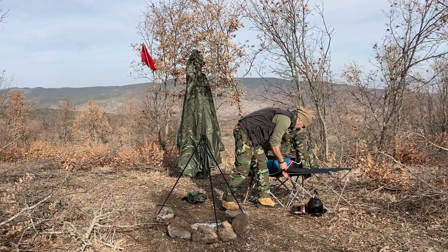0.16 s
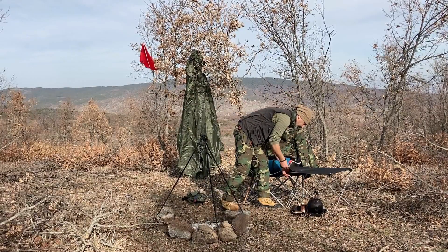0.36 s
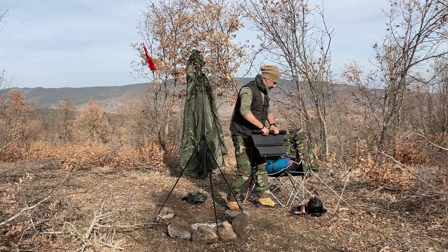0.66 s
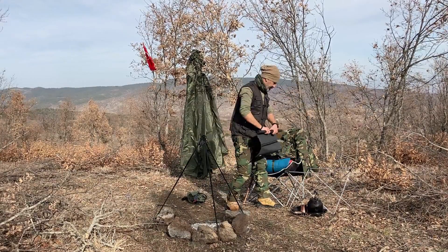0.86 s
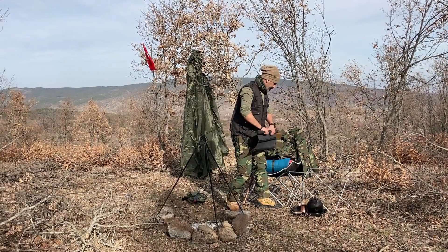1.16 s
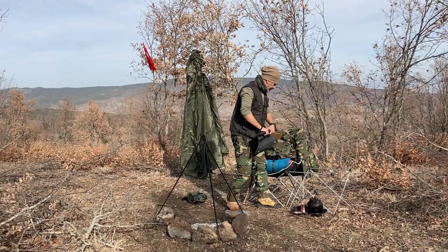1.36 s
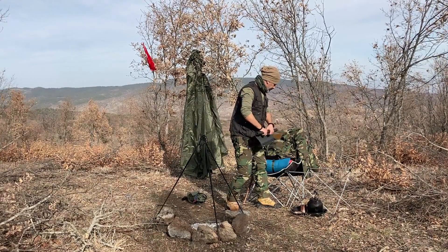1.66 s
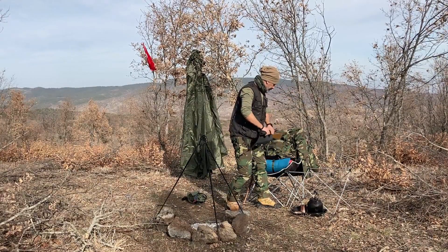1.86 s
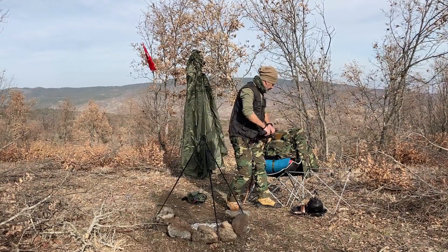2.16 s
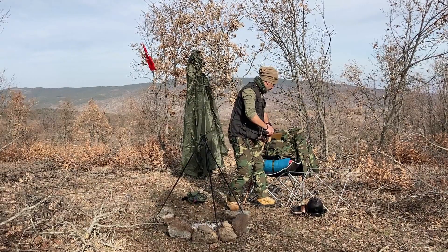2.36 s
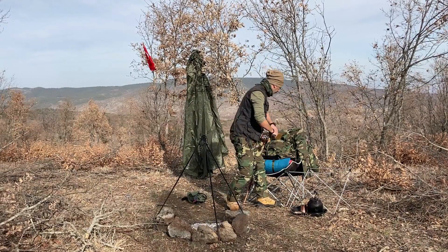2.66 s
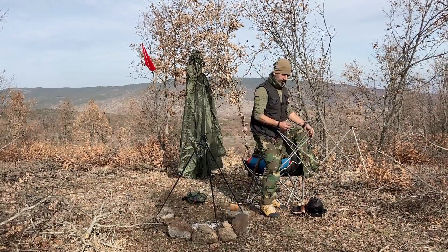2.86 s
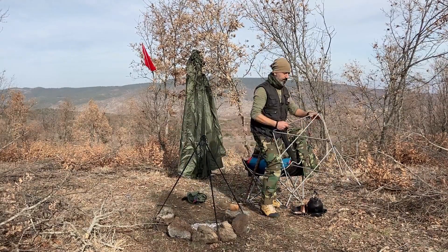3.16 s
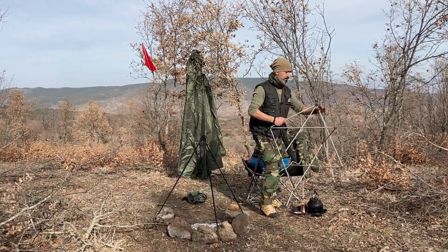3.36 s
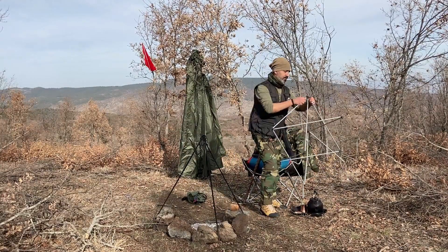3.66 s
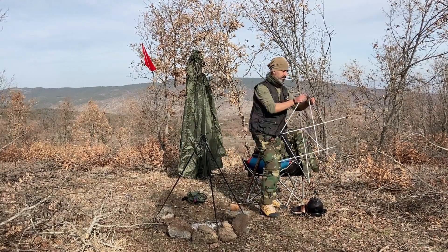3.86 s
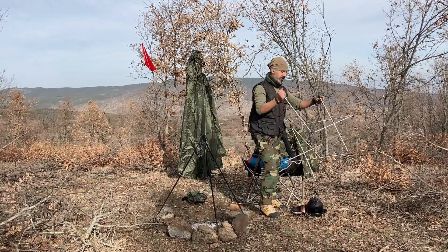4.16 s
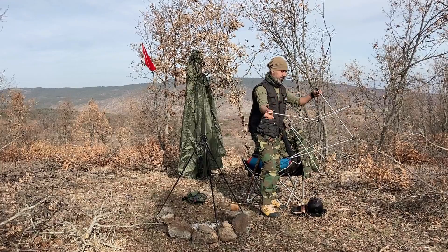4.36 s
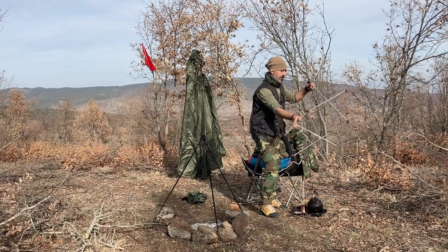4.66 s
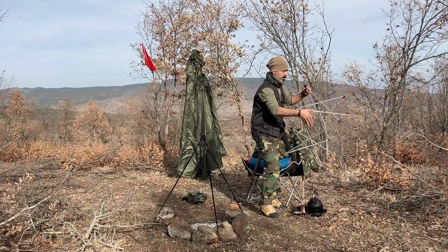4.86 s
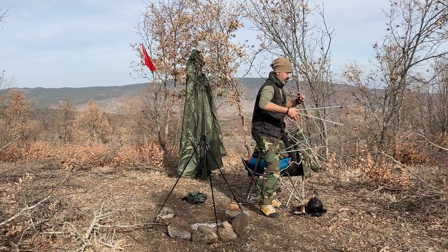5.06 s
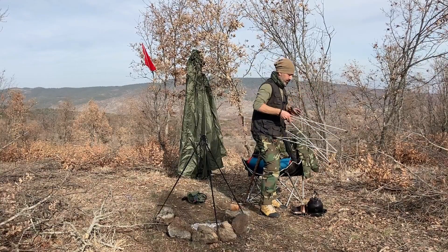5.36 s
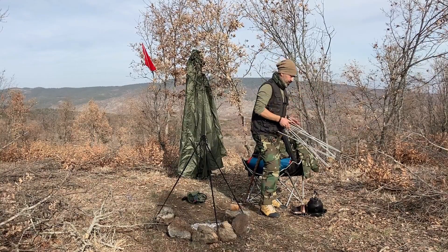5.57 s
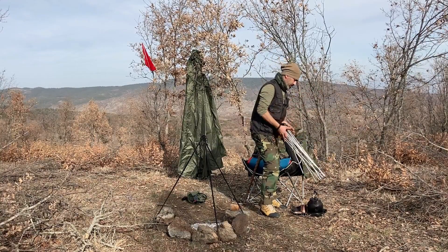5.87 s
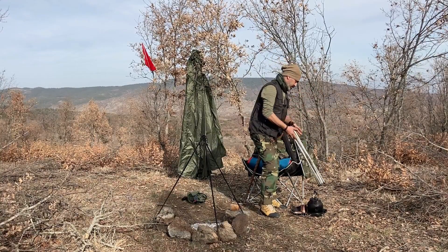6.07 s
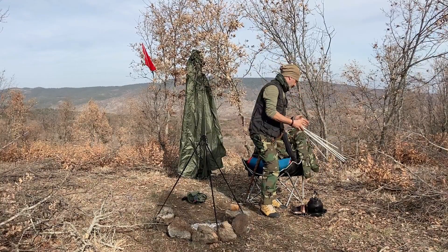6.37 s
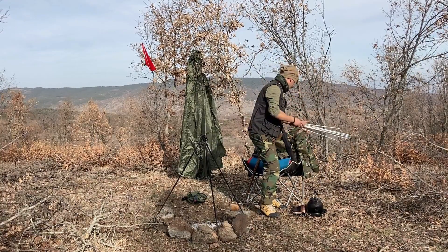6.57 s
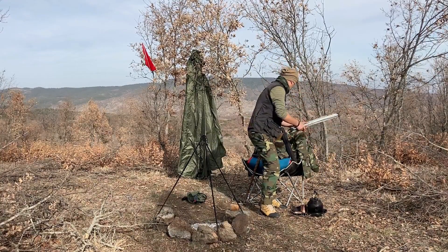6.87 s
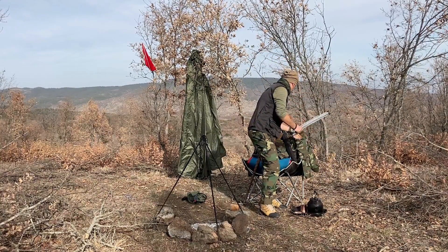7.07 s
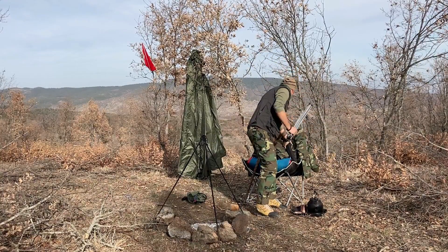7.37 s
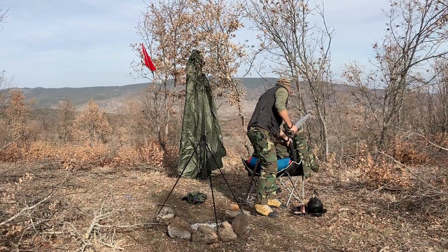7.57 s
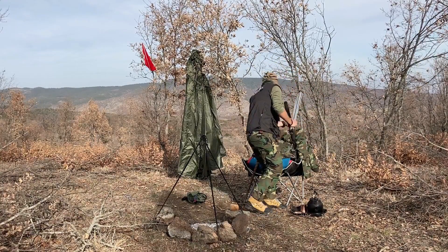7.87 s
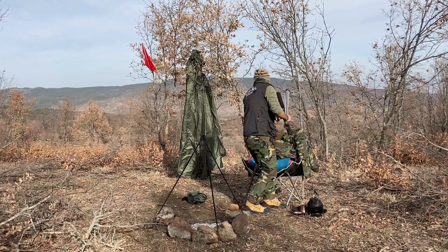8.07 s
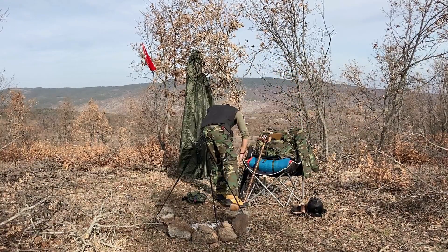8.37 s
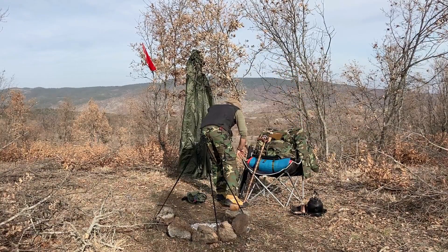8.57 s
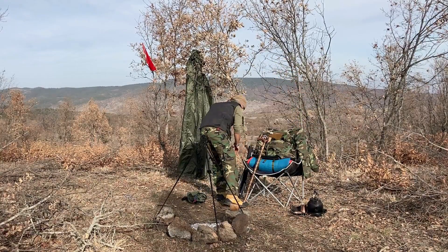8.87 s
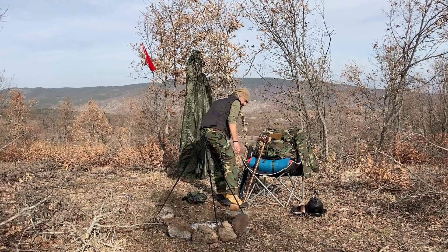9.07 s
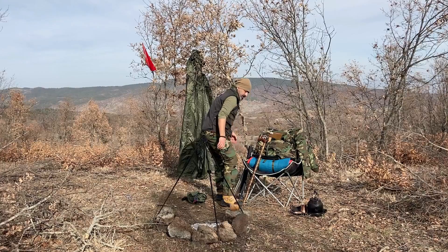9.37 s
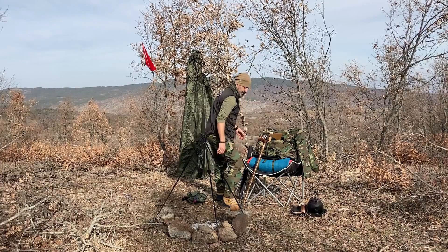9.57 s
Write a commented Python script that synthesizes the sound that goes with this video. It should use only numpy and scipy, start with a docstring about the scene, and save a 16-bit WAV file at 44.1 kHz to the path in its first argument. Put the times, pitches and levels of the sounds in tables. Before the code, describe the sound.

Close clothing rustles and soft thuds as a table top is rolled up, then thin metal poles clack together in quiet open air.

```python
"""A low rumble and rubbing cloth come first, then the dull knocks of a camping table top, outdoors.
The top comes off the frame and is rolled up against a nylon vest; then the folded frame's poles clack.
A microphone worn on the clothes hears it all over quiet air. Cloth, air and rumble are filtered noise;
knocks and clacks are noise bursts with decaying modes; swishes and faint distant chirps are tones of
unsteady pitch."""
import sys
import numpy as np
from scipy import signal
from scipy.fft import rfft, irfft
from scipy.io import wavfile
from scipy.ndimage import uniform_filter1d

SR = 44100
rng = np.random.default_rng(int(sys.argv[2]) if len(sys.argv) > 2 else 0)


def master(y):
    """Save y as 16-bit WAV."""
    cut = np.clip(np.atleast_2d(y).T, -1, 1)
    pcm = np.round(cut * 32767)  # scale
    wavfile.write(sys.argv[1], SR, pcm.astype(np.int16))


N = 428957
T = np.arange(N) / SR

# Spectra, each a curve of (frequency [Hz], relative level [dB])
# distant open air
AIR_SPECTRUM = [(60, -1), (120, -5), (380, -4), (800, -12.5), (1700, -18), (2500, -15), (3500, -21.5),
                (4500, -19), (6500, -23.5), (8400, -21.5), (10500, -30), (14000, -33.5), (16000, -49.5)]
# low pushing on the microphone
BUFFET_SPECTRUM = [(5, -7.5), (15, 5), (35, -5), (60, -9.5), (100, -17), (200, -38.5), (500, -57)]
# flapping folds
FLAP_SPECTRUM = [(60, -14), (130, -1), (270, 0), (500, -5.5), (800, -12.5), (1600, -42)]
# layers of cloth rubbing
RUB_SPECTRUM = [(250, -18.5), (600, -2), (1100, 2.5), (2300, -2), (3500, -8.5), (6000, -16), (12000, -55)]
# nylon hissing
NYLON_SPECTRUM = [(1500, -17.5), (3500, -2.5), (5000, -2), (7000, 0), (9200, 2.5), (10600, -5), (13500, -6),
                  (14700, -18), (15800, -32)]
# a fold snapping over
CREASE_SPECTRUM = [(80, -9), (250, 1.5), (1200, -8.5), (2500, -8.5), (6000, -14.5), (15000, -36.5)]
# dull blow, before its three bands are levelled
THUD_SPECTRUM = [(40, -19), (130, -0.5), (240, -3.5), (400, -1.5), (550, -2.5), (1100, -1), (2400, -7.5),
                 (4000, -24.5), (7000, -27), (15000, -45.5)]
# metal contact itself, struck or scraped
CONTACT_SPECTRUM = [(60, -26), (300, -20.5), (700, -4), (1500, -0.5), (4000, 0.5), (8000, -0.5),
                    (10500, -7.5), (15000, -41.5)]

# Body bending or shifting against the microphone: (time [s], length [s], level [dB])
BODY_SHIFTS = [(0.0, 0.14, -29.5), (0.157, 0.19, -23), (0.32, 0.19, -27), (0.5, 0.19, -39),
               (1.09, .65, -38), (2.33, 0.26, -31), (3.19, 0.27, -45), (5.43, 0.53, -34),
               (6.047, 0.36, -38.5), (6.594, 0.25, -41), (8.06, 0.23, -40.5), (8.93, 0.69, -45),
               (9.26, 0.53, -34.5)]
# Soft bumps against the microphone: (time [s], envelope peak [dB], frequency [Hz])
SOFT_BUMPS = [(2.53, -27, 45), (2.919, -38.5, 121), (5.823, -18.5, 60)]
# Faint distant chirps or whistles, perhaps of a bird:
# (time [s], length [s], peak of the fundamental [dB], start pitch [Hz], end pitch [Hz])
FAINT_CHIRPS = [(8.312, .045, -55, 3250, 3100), (8.48, 0.088, -67, 2350, 2200),
                (8.97, .09, -66, 2500, 2300)]
# Slow arm movements drawing sleeves over the vest, before the mixing gains of cloth():
# (time [s], length up to release [s], rubbing [dB], flapping [dB re rubbing], hiss [dB re rubbing])
ARM_REACHES = [(-0.1, .19, -50.5, -0.5, -5), (0.42, 0.19, -56, -0.5, -4.5), (1.9, 0.63, -49.5, -1, -5),
               (3.27, 0.14, -53.5, -0.5, -4), (3.5, 0.33, -68, 5.5, 12), (3.82, 0.58, -65, 0.5, -1.5),
               (4.45, 0.61, -67, -0.5, 0), (5.03, 0.31, -56, -0.5, 1.5), (5.41, 0.17, -52, 9, -3),
               (5.62, 0.24, -54, 6.5, -0.5), (5.98, .25, -49.5, 0.5, -3), (6.27, 0.34, -58.5, 2, -1.5),
               (6.66, 0.092, -55, -3.5, 6), (6.94, 0.14, -63, 4, 8.5), (7.15, 0.3, -64, 5.5, 7),
               (7.41, .19, -47.5, -0.5, -0.5), (7.68, 0.21, -64.5, -2, -2), (7.93, 0.31, -56.5, 0, -1),
               (8.3, 0.84, -75, 6.5, 5.5), (8.95, 0.41, -65, 7, -3), (9.3, 0.74, -61.5, 1, -9)]
# Quick tugs of cloth, as in rolling up the table top, before the mixing gains of cloth():
# (time [s], length up to release [s], rubbing [dB], flapping [dB re rubbing], hiss [dB re rubbing])
CLOTH_TUGS = [(0.26, 0.052, -48.5, 7, -19), (0.47, 0.064, -53.5, 5, 0), (0.724, 0.16, -41, -3.5, -4.5),
              (0.88, 0.14, -48, 1, 1.5), (1.01, 0.072, -42, -1.5, -1), (1.105, 0.055, -42, 2.5, -7),
              (1.167, 0.11, -40, -2, -0.5), (1.285, 0.053, -36.5, 1.5, -2.5),
              (1.37, 0.051, -40.5, -0.5, -4), (1.425, 0.027, -44.5, 1, 3.5), (1.458, .14, -38.5, 0, -2),
              (1.6, 0.17, -40.5, -0.5, 0.5), (1.78, 0.044, -36.5, 3.5, -4), (1.84, .05, -43.5, -0.5, 2.5),
              (1.895, 0.05, -48, 0, 4), (1.955, 0.088, -44, 1, 3), (2.108, 0.052, -40, -4, 1),
              (2.175, 0.097, -50.5, 2, -1), (2.258, 0.07, -44, 6.5, 4), (2.345, 0.11, -40, 0, 1),
              (2.56, 0.095, -42, -4, 5.5), (2.665, 0.081, -42.5, 4.5, 2), (2.752, 0.07, -38.5, 1, 1),
              (2.85, 0.07, -48.5, 2.5, 2), (2.95, .075, -71, -11, 11), (8.144, 0.062, -42, -7, 6.5)]
# Ribbed cloth sliding: (time [s], length [s], level [dB], start pitch [Hz], end pitch [Hz],
# unsteadiness [relative to pitch, before scaling])
RIB_SWISHES = [(0.215, 0.023, -31, 2270, 2530, 0.27), (0.222, 0.028, -23, 257, 247, 0.11),
               (0.257, .06, -54, 2400, 2220, 0.16), (0.463, 0.088, -54.5, 5940, 6900, 0.24),
               (1.833, 0.025, -31, 1056, 1030, 0.11), (2.119, 0.046, -40.5, 1906, 1380, 0.16),
               (2.237, 0.058, -34.5, 1187, 1685, 0.34), (2.406, 0.055, -39, 2310, 4200, 0.28),
               (3.544, 0.048, -62, 2200, 2640, 0.089), (3.551, 0.057, -59, 3700, 4500, 0.11),
               (3.655, 0.11, -71, 2400, 3000, 0.22), (3.569, 0.28, -54.5, 6000, 9100, 0.18),
               (3.619, 0.23, -52, 12400, 13000, .09), (3.885, 0.081, -55, 3300, 3420, 0.29),
               (3.96, 0.25, -65.5, 3270, 3040, 0.155), (4.075, 0.09, -56.5, 724, 656, 0.1),
               (4.262, 0.1, -63, 2280, 3240, 0.24), (5.318, 0.1, -52.5, 1710, 2370, 0.15),
               (7.389, 0.056, -43.5, 1776, 1675, 0.23), (7.509, 0.061, -45.5, 348, 295, .1),
               (9.228, 0.027, -43, 436, 430, 0.19)]
# Pole sliding on pole: (time [s], length [s], level [dB], singing frequency [Hz])
POLE_SCRAPES = [(5.063, 0.055, -41, 4970), (6.737, 0.024, -41, 6700), (6.779, 0.053, -38, 9100),
                (6.849, 0.023, -46, 6000), (7.16, 0.003, -32, 4500)]
# Modes of the table top: (frequency [Hz], bandwidth [Hz], relative level [dB])
TABLE_TOP_MODES = [(271, 38, 4.5), (562, 41, -5.5), (724, 42, 1), (1046, 77, 1.5), (1400, 49, -4.5),
                   (2480, 48, -17)]
# Dull knocks and cloth snaps: (time [s], level over 10 ms [dB], bass [dB re level],
# treble [dB re level], decay time t60 of the dull clatter [s])
DULL_KNOCKS = [(0.2352, -18, -6.5, -19, 0.061), (0.2416, -27.5, 6.5, -1.5, 0.017),
               (0.2516, -19.5, -2, -23, 0.024), (0.374, -29.5, -1.5, -43, 0.028),
               (0.4307, -15.5, -3.5, -14.5, 0.032), (0.451, -18, -1, -16, 0.047),
               (0.7606, -35.5, 0, -8, 0.027), (0.7679, -38, 7, -8, 0.053), (0.794, -35.5, 1, -19.0, 0.035),
               (0.8655, -36.5, -8, -16, 0.14), (1.0286, -32.5, -6, -9, 0.018),
               (1.2296, -25.5, -12, -6.5, 0.0068), (1.312, -38.5, 5, -5, 0.075),
               (1.4552, -30, 3, -28, 0.025), (1.5793, -26, -4.5, -32, 0.032), (1.6653, -36, 2, -15, 0.046),
               (1.92, -33, 0, -25, 0.025), (2.3869, -31.5, -2.0, -3.5, 0.033),
               (2.4066, -21, -7.5, -13, 0.0012), (2.528, -33.5, 6.5, -3.5, 0.034),
               (2.7839, -33, 0.5, -3.5, 0.091), (5.571, -50, 9.5, -10, 0.027), (6.251, -55, 13, -8, 0.035),
               (7.454, -51.5, 13, -12.0, 0.064), (8.0172, -45, -1.0, -21, 0.0082),
               (8.081, -50, 9, -13, 0.028), (8.1443, -36.5, 1, -6, 0.094), (8.501, -56.5, -3, -21, 0.025),
               (9.349, -51, 13.5, -19, 0.018)]
# Modes of the poles: (nominal frequency [Hz], bandwidth [Hz], relative level [dB])
TUBE_MODES = [(1250, 170, -6), (1940, 270, -10.5), (2270, 180, -1.5), (2730, 83, -7), (3210, 150, -1),
              (3615, 91, -4), (4140, 170, 4.5), (4640, 110, -3), (5244, 150, 3), (5890, 120, 2.5),
              (6600, 160, 5.5), (7180, 94, -3.5), (7580, 95, -4.5), (8260, 140, 4), (8960, 150, 1.5),
              (9250, 110, -3.5), (9880, 86, -5.5), (11360, 150, -10), (11700, 110, -10.5),
              (13000, 110, -8.5), (14000, 92, -14.5)]
# Pole on pole: (time [s], level over 10 ms [dB], body [dB re level], top [dB re level],
# main favoured region [Hz], lower favoured region [Hz])
POLE_CLACKS = [(2.9589, -47.5, -7, -5, 2410, 2290), (3.091, -57.5, -11, -25, 3750, 870),
               (3.137, -50.0, -5, -25, 4320, 1580), (3.6865, -45, -10, -12, 3510, 2100),
               (3.9589, -27.5, -8.5, -10.5, 5080, 3560), (4.8952, -21.0, -18.5, -20, 5610, 3600),
               (4.966, -45, 2.5, -27, 2400, 2290), (5.0411, -15.0, -18.5, -16, 6300, 3110),
               (5.054, -25, -20, -17, 5980, 3100), (5.1375, -42, -15, -18, 5230, 3600),
               (5.1462, -44, -18, -23, 3420, 2290), (5.1789, -30, -4, -5.5, 5370, 2020),
               (5.1971, -29.5, -17, -22, 3420, 2290), (5.217, -46, -16, -13, 5430, 3520),
               (5.4624, -39.5, -1, -19, 6020, 1390), (5.476, -35, -4, -19, 2430, 1980),
               (5.4806, -38.5, 3.5, -25, 2800, 1400), (5.5177, -41, -3, -10, 2500, 1390),
               (5.5338, -42.5, -5, -6, 4210, 1130), (5.7524, -28, -14, -8, 7610, 2020),
               (5.8713, -37.5, -14, -12, 8420, 3000), (5.9806, -40, -14, -12, 6870, 3600),
               (6.0521, -41, -3.5, -15, 8550, 1780), (6.1101, -41.5, -7, -13, 2400, 2290),
               (6.1394, -33.5, -2.5, -11, 6490, 1820), (6.16, -40.5, 1, -20, 9180, 1360),
               (6.334, -46.5, -16, -16, 8410, 1430), (6.374, -44.0, 2, -20, 2760, 1290),
               (6.43, -42.0, -5, -23, 4960, 1360), (6.4729, -44.5, -8, -15, 7020, 1870),
               (6.6859, -14, -10.5, -21.5, 8200, 1970), (6.7603, -34.5, -16, -16.5, 8990, 2380),
               (6.7901, -34, -4, -19, 6710, 2110), (6.8191, -30.5, -12, -21, 2970, 2230),
               (6.861, -17.5, -18, -13.5, 8250, 2200), (7.104, -37.5, -4, -23.5, 3820, 1420),
               (7.1631, -13.5, -8.5, -13.5, 4150, 1720), (7.18, -24, -15, -16.5, 8480, 2630),
               (7.1957, -36.5, -17, -18, 5100, 3600), (7.319, -46, -4, -19, 2400, 2230),
               (7.4876, -42, -4, -13, 4830, 2100), (7.499, -31.5, -16, -7, 4800, 3600),
               (7.533, -41, -5, -7, 4830, 1890), (7.6582, -23, -20, -11.5, 6330, 2550),
               (7.66, -17.5, -16, -4, 7620, 2720), (7.672, -36.5, -14, -10.5, 4720, 3600),
               (8.103, -46, -10, -14, 4300, 2660), (8.722, -48.5, 1, -8, 6940, 1230),
               (9.1498, -51.5, -6, -18, 8800, 1080)]

AIR_DB = -58.5
SWAY_DB, SWAY_DEPTH_DB, SWAY_HZ = -49.5, 3.5, 6  # the slight sway of someone standing
PUSH_DB = -0.5  # rumble relative to the flapping that causes it
SHIFT_TAPER = 0.5  # share of a shift spent swelling and fading
BUMP_RISE_S = 0.0058
CHIRP_OVERTONE_DB = -4  # relative to the fundamental
CREASES_PER_S, CREASE_DB, CREASE_SPREAD_DB = 45, -9, 7.5  # the level is relative to the rubbing
REACH_ATTACK_S, REACH_RELEASE_S = 0.073, 0.092
TUG_ATTACK_S, TUG_RELEASE_S = 0.007, 0.025
BAND_EDGE_HZ = 15700


def amp(db):
    """Definition of level: decibels to an amplitude ratio."""
    return 10 ** (np.asarray(db) / 20)


def evened(x):
    """Normalization of power: scales to rms 1."""
    return x / np.sqrt(np.mean(x ** 2) + 1e-20)


def add(mix, start_s, sound):
    """Superposition: adds a sound into the mix, in place, from a start time."""
    part = mix[max(round(start_s * SR), 0):][:len(sound)]
    part += sound[:len(part)]


def colour(x, spectrum, size=8192):
    """Minimum-phase filtering: a causal response made from the Hilbert transform of the log gain."""
    hz, db = np.transpose(spectrum)
    bin_hz = abs(np.fft.fftfreq(size, 1 / SR)) + 1
    log_gain = np.log(amp(np.interp(np.log(bin_hz), np.log(hz), db)))
    response = np.exp(np.conj(signal.hilbert(log_gain)))
    taps = np.fft.ifft(response).real[:size // 2]
    return signal.oaconvolve(x, taps)[:len(x)]


def wander(rate_hz):
    """Band-limited chance: Gaussian low-passed noise of rms 1, about as fast as the rate."""
    spectrum = rfft(rng.standard_normal(N))
    lowpass = np.exp(-(np.fft.rfftfreq(N, 1 / SR) / rate_hz) ** 2)
    return evened(irfft(spectrum * lowpass, N))


def voiced(x, low_hz, high_hz, levels_db, order=8):
    """Band energy: sets the low, middle and high parts of a hit to their levels over 10 ms."""
    span = 0.01 * SR
    low_filter = signal.butter(order, low_hz, "low", fs=SR, output="sos")
    high_filter = signal.butter(order, high_hz, "high", fs=SR, output="sos")
    low = signal.sosfiltfilt(low_filter, x, padtype=None)
    high = signal.sosfiltfilt(high_filter, x, padtype=None)
    bands = (low, x - low - high, high)
    return sum(amp(db) * band * np.sqrt(span) / np.linalg.norm(band)
               for db, band in zip(levels_db, bands))


def outdoors():
    """Stationary broadband noise: steady distant air."""
    return amp(AIR_DB) * evened(colour(rng.standard_normal(N), AIR_SPECTRUM))


def chirps():
    """Frequency-modulated tone: a short gliding chirp of unsteady pitch with one overtone."""
    out = np.zeros(N)
    for start_s, length_s, db, start_hz, end_hz in FAINT_CHIRPS:
        count = int(length_s * SR)
        pitch_hz = np.linspace(start_hz, end_hz, count) * (1 + 0.02 * wander(200)[:count])
        phase = 2 * np.pi * np.cumsum(pitch_hz) / SR
        tone = np.sin(phase) + amp(CHIRP_OVERTONE_DB) * np.sin(2 * phase)
        add(out, start_s, amp(db) * np.hanning(count) * tone)
    return out


def rumble(flap):
    """Pressure on the microphone: sway, flapping cloth and body shifts modulate low noise."""
    push = amp(SWAY_DB + SWAY_DEPTH_DB * wander(SWAY_HZ)) + amp(PUSH_DB) * flap
    shifts = np.zeros(N)
    for start_s, length_s, db in BODY_SHIFTS:
        add(shifts, start_s, amp(db) * signal.windows.tukey(int(length_s * SR), SHIFT_TAPER))
    buffet = evened(colour(rng.standard_normal(N), BUFFET_SPECTRUM))
    return np.hypot(push, shifts) * buffet


def bumps(size=8192):
    """Heavily damped oscillation: a low swing that dies within a few cycles."""
    out, t = np.zeros(N), np.arange(size) / SR
    envelope = t / BUMP_RISE_S * np.exp(1 - t / BUMP_RISE_S)
    for start_s, db, hz in SOFT_BUMPS:
        add(out, start_s, amp(db) * envelope * np.sin(2 * np.pi * hz * t))
    return out


def efforts(movements, attack_s, release_s):
    """Power addition of movements that grip, hold and let go: gains of rubbing, flapping and hiss."""
    power = np.zeros((3, N))
    for start_s, length_s, db, flap_db, hiss_db in movements:
        attack = np.clip((T - start_s) / attack_s, 0, 1)
        release = np.exp(-np.clip((T - start_s - length_s) / release_s, 0, 20))
        gains = amp([[db], [db + flap_db], [db + hiss_db]])
        power += (gains * attack * release) ** 2
    return np.sqrt(power)


def friction(spectrum, catches_hz, catch_db, flutter_db, flutter_hz):
    """Stick-slip friction: a dense, fluttering stream of slips with random harder catches."""
    slips, signs = rng.standard_normal((2, N))
    catches = signs * (rng.random(N) < catches_hz / SR)
    contacts = slips + amp(catch_db) * evened(catches)
    return evened(colour(contacts * amp(flutter_db * wander(flutter_hz)), spectrum))


def creases():
    """Buckling as a random impulse process: folds snap over, a few of them hard."""
    size = amp(CREASE_SPREAD_DB * np.minimum(rng.exponential(1, N), 2)) * rng.choice([-1, 1], N)
    snaps = size * (rng.random(N) < CREASES_PER_S / SR)
    return evened(colour(snaps, CREASE_SPECTRUM))


def cloth(effort, flap_db, rub_db, hiss_db, grip_db):
    """Modulated friction: folds flap, layers rub and snap, nylon hisses, under one uneven grip."""
    rub, flap, hiss = effort
    grip = amp(grip_db * wander(31))
    flapping = amp(flap_db) * flap * friction(FLAP_SPECTRUM, 60, 0.8, 1.5, 24)
    layers = friction(RUB_SPECTRUM, 220, 0, 1.2, 60) + amp(CREASE_DB) * creases()
    rubbing = amp(rub_db) * rub * layers
    hissing = amp(hiss_db) * hiss * friction(NYLON_SPECTRUM, 900, -8.5, 1.0, 34)
    return grip * (flapping + rubbing + hissing)


def folds(x, patchy_db, size=512):
    """Time-varying filtering: shifting folds lift and shade patches of the spectrum."""
    z = signal.stft(x, nperseg=size)[2]
    across_frequency = uniform_filter1d(rng.standard_normal(z.shape), size=7, axis=0)
    patches = evened(uniform_filter1d(across_frequency, size=5, axis=1))
    return signal.istft(z * amp(patchy_db * patches), nperseg=size)[1][:N]


def swishes():
    """Periodic ticking: ribs of the weave pass each other at an unsteady, gliding rate."""
    out = np.zeros(N)
    for start_s, length_s, db, start_hz, end_hz, spread in RIB_SWISHES:
        count = int(length_s * SR)
        blur_hz = np.clip(spread, 0.02, 0.4) * start_hz
        lowpass = signal.butter(2, blur_hz, fs=SR, output="sos")
        unsteady, grip = signal.sosfilt(lowpass, rng.standard_normal((2, count)))
        rate_hz = np.linspace(start_hz, end_hz, count) * (1 + 0.614 * spread * evened(unsteady))
        tone = np.sin(2 * np.pi * np.cumsum(rate_hz) / SR)
        add(out, start_s, amp(db) * evened(grip * tone * signal.windows.tukey(count, 0.8)))
    return out


def scrapes(sing_db=-2, sharpness=9):
    """Friction-driven resonance: metal rasps on metal and sings in one broad peak."""
    out, rasp = np.zeros(N), friction(CONTACT_SPECTRUM, 900, 0, 2, 200)
    for start_s, length_s, db, hz in POLE_SCRAPES:
        rub = rasp[int(start_s * SR):][:int(length_s * SR)]
        sing = signal.lfilter(*signal.iirpeak(hz, sharpness, fs=SR), rub)
        both = evened(rub) + amp(sing_db) * evened(sing)
        add(out, start_s, amp(db) * evened(both * signal.windows.tukey(len(rub), 0.5)))
    return out


def knocks(clatter=0.25, treble_life=0.77, ring_db=-6, size=4096):
    """Impact excitation: a push and a clatter whose treble dies first; loose blows ring the top more."""
    out, t = np.zeros(N), np.arange(size) / SR
    hz, width_hz, mode_db = np.transpose(TABLE_TOP_MODES)[:, :, None]
    modes = (amp(mode_db) * np.exp(-np.pi * width_hz * t) * np.sin(2 * np.pi * hz * t)).sum(0)
    dull_filter = signal.butter(2, 1900, fs=SR, output="sos")
    for start_s, knock_db, bass_db, treble_db, t60 in DULL_KNOCKS:
        noise = rng.standard_normal(size)
        dull = signal.sosfiltfilt(dull_filter, noise)
        bright = noise - dull
        blow = clatter * (dull * amp(-60 * t / t60) + bright * amp(-60 * t / (treble_life * t60)))
        blow[0] += 1  # the push
        looseness = min(t60 / 0.04, 1)
        hit = evened(colour(blow, THUD_SPECTRUM)) + amp(ring_db) * looseness * evened(modes)
        # leading silence leaves room for the zero-phase band filters
        hit = np.concatenate([np.zeros(size), hit])
        levels_db = knock_db + np.array([bass_db, 0, treble_db])
        add(out, start_s - size / SR, voiced(hit, 515, 3090, levels_db))
    return out


def clacks(crack_t60=0.028, crack_db=-2, contact=4, ring_db=7, ring_width_hz=700,
           low_ring_db=3, low_ring_width_hz=400, scatter_db=-31, scatter_t60=0.11,
           rise_s=0.00045, size=4096):
    """Modal excitation of hand-damped tubes: a crack and short modes weighted by the striking place."""
    out, t = np.zeros(N), np.arange(size) / SR
    hz, width_hz, mode_db = np.transpose(TUBE_MODES)[:, :, None]
    for start_s, clack_db, body_db, top_db, ring_hz, low_ring_hz in POLE_CLACKS:
        place, detune = rng.uniform(-1.07, 1, (2, len(hz), 1))
        weights = amp(mode_db) * np.sin(np.pi * place)
        tones = np.sin(2 * np.pi * hz * (1 + 0.014 * detune) * t)
        modes = (weights * np.exp(-np.pi * width_hz * t) * tones).sum(0)
        # ground and brush scatter a faint tail after the crack
        decay = amp(-60 * t / crack_t60) + amp(scatter_db - 60 * t / scatter_t60)
        crack = rng.standard_normal(size) * decay
        crack[0] = contact
        hit = evened(modes) + amp(crack_db) * evened(colour(crack, CONTACT_SPECTRUM))
        hit = hit * (1 - np.exp(-t / rise_s))
        # each blow favours the modes in two regions
        regions = ((ring_hz, ring_width_hz, ring_db), (low_ring_hz, low_ring_width_hz, low_ring_db))
        hit = hit + sum(amp(lift_db) * signal.lfilter(*signal.iirpeak(f, f / wide, fs=SR), hit)
                        for f, wide, lift_db in regions)
        levels_db = clack_db + np.array([body_db, 0, top_db])
        add(out, start_s, voiced(hit, 2300, 10400, levels_db))
    return out


def scene():
    """Superposition of open air and chirps, the rumble, brisk and gentle cloth, and the gear."""
    tugs = efforts(CLOTH_TUGS, TUG_ATTACK_S, TUG_RELEASE_S)
    reaches = efforts(ARM_REACHES, REACH_ATTACK_S, REACH_RELEASE_S)
    background = outdoors() + chirps() + rumble(tugs[1] + reaches[1]) + bumps()
    brisk = cloth(tugs, flap_db=0, rub_db=-1.5, hiss_db=-0.5, grip_db=2.22)
    gentle = cloth(reaches, flap_db=0, rub_db=0, hiss_db=1, grip_db=1.18)
    fabric = folds(brisk + gentle, patchy_db=2.5) + swishes()
    gear = scrapes() + knocks() + clacks()
    return (background + fabric + gear)[None]


def record(dry):
    """Overload and band limiting: peaks beyond full scale are clipped, then a low-pass follows."""
    lowpass = signal.firwin(255, BAND_EDGE_HZ, window=("kaiser", 9), fs=SR)
    return signal.oaconvolve(np.clip(dry, -1, 1), lowpass[None], "same")


dry = scene()
out = record(dry)
master(out)
```